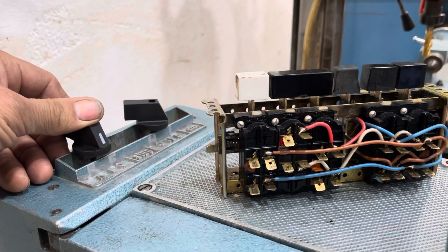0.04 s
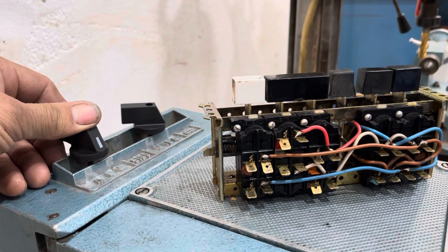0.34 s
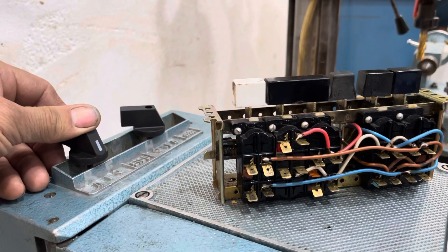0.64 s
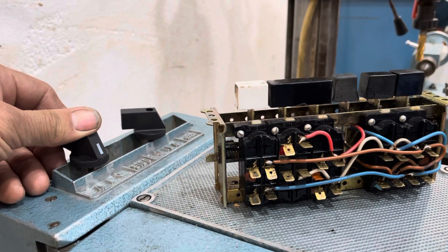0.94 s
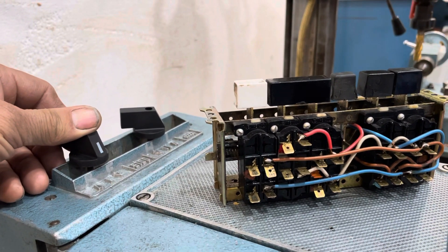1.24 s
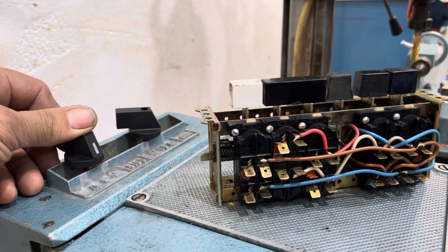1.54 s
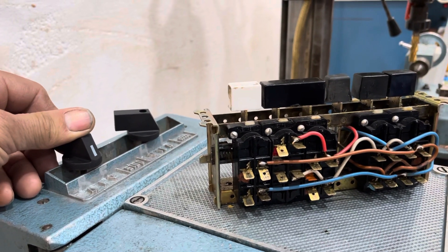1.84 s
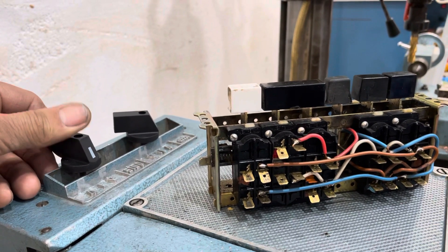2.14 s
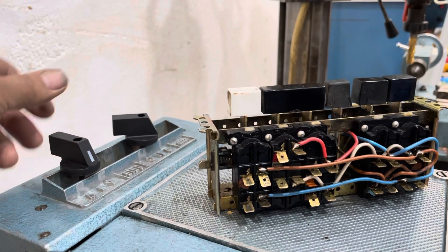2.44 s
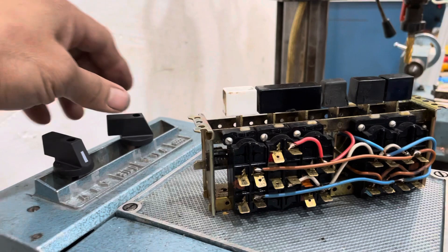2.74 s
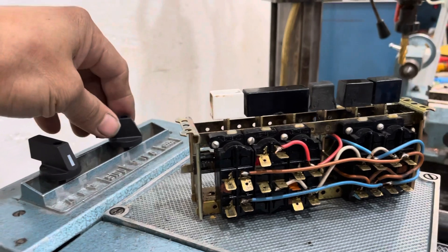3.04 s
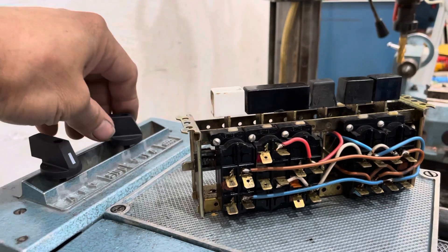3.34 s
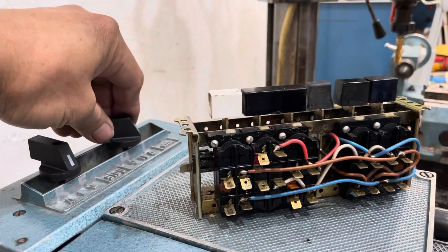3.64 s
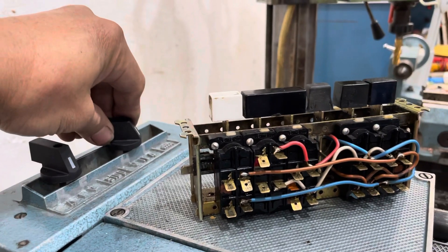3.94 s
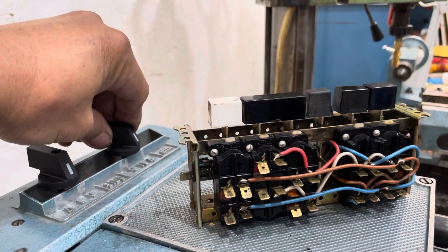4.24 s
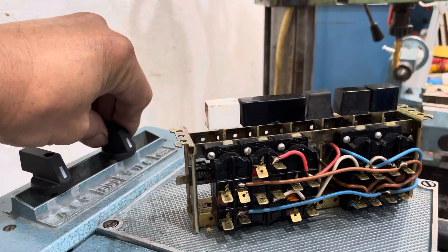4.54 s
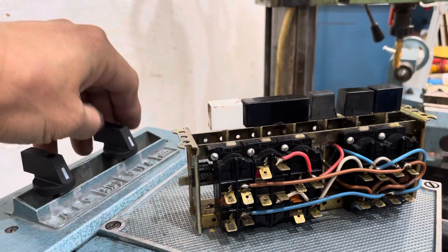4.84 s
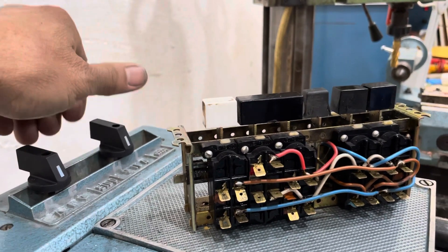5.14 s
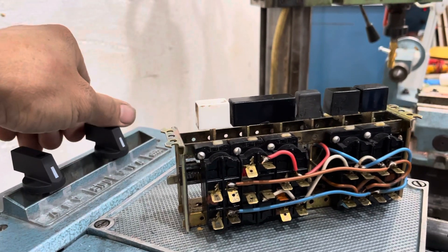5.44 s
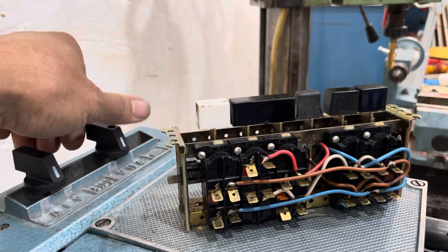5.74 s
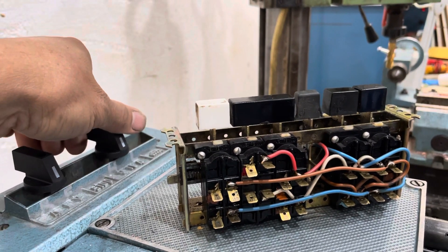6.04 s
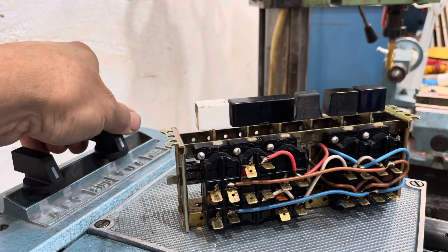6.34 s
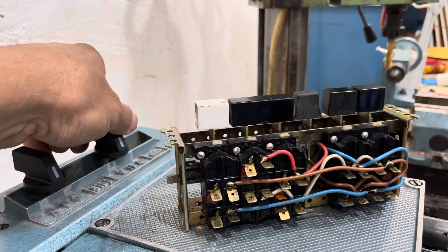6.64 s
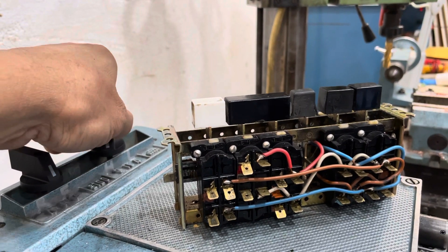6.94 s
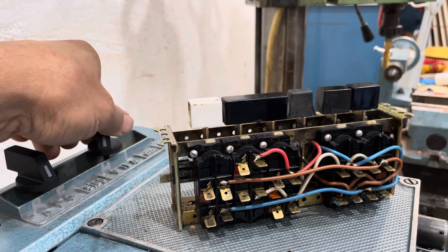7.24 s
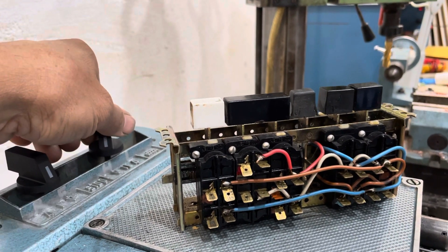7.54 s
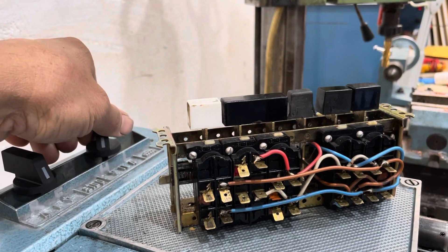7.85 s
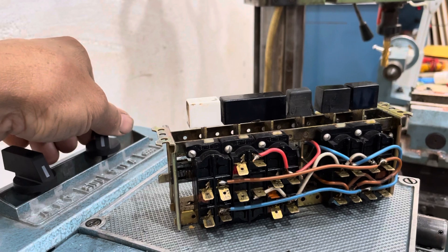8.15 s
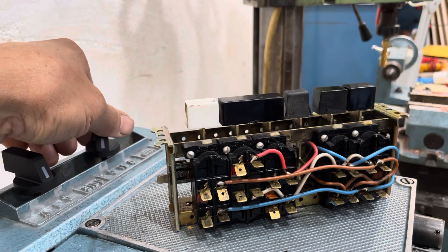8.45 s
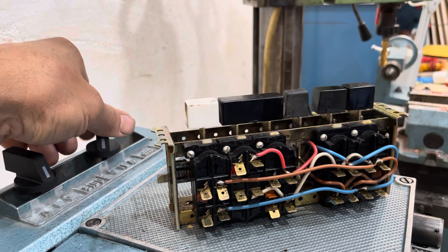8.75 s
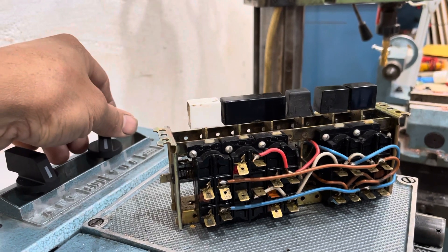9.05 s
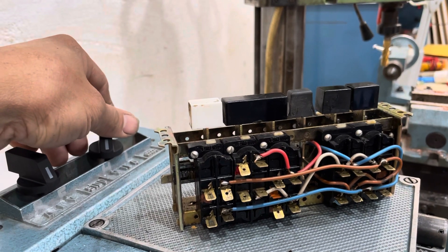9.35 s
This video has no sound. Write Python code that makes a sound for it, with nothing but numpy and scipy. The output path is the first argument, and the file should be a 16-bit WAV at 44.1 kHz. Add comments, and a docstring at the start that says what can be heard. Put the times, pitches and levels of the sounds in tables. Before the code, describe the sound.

Heard from close by in a workshop, a lathe motor hums steadily under a soft whine and rattle of gears. After a few small clicks, a switch turns it off, and it coasts down with falling tones and loose knocks. Following a short lull, a loud snap restarts it. It spins up quickly with a howl and settles at high speed, whining and rattling, while loose parts buzz and tick.

```python
"""A geared metal lathe runs in low speed, close to a two-port microphone in a workshop: the motor hums at
twice the mains frequency, gears and rotor slots whine, and tooth rattle rings the headstock. A rotary
switch scrapes and snaps off; the hum swells and dies, and slack gears knock and sing downward to rest.
The switch creaks and snaps on, the starting current makes the motor shudder and howl, and the lathe
climbs to high speed, where covers chatter and loose metal parts tick."""
import sys
import numpy as np
from scipy import signal
from scipy.fft import rfft, irfft, next_fast_len
from scipy.io import wavfile
from scipy.ndimage import uniform_filter1d

SR = 44100
rng = np.random.default_rng(int(sys.argv[2]) if len(sys.argv) > 2 else 0)


def waveform_to_disk(signal):
    """Save audio, clipped to [-1, 1], as 16-bit WAV at the path in sys.argv[1]."""
    frames = np.transpose(np.atleast_2d(signal))
    scaled = np.clip(frames, -1, 1) * 32767
    samples = np.round(scaled).astype(np.int16)
    wavfile.write(sys.argv[1], SR, samples)


N = 422478
TIME = np.arange(N) / SR
SIZE = next_fast_len(N + SR // 4, real=True)
BINS = np.maximum(np.arange(SIZE // 2 + 1) * SR / SIZE, 1)

OFF_S, ON_S, MAINS_HZ = 4.28, 6.8, 60
LOW_SPEED, HIGH_SPEED = 9.387, 18.733  # spindle turns per second
SLOT_ORDER = 66.36  # an order counts cycles per spindle turn
RESTARTED = TIME > ON_S

# room tone colour: f/Hz, level/dB
SHOP_COLOUR = [(18, -44.5), (30, 4.5), (125, -0.5), (228, -13.5), (511, -24.5), (837, -34), (1200, -27),
               (2630, -39.5), (15000, -46)]
# stereo image by frequency, wide in the middle, nearly mono in the highest treble:
# f/Hz, left phase lead/rad, likeness/0-1, left minus right/dB
STEREO_IMAGE = [(100, 0, .99, .2), (400, .1, .85, .8), (630, 0, .7, 1.8), (800, 0, .62, .6),
                (1300, -1.3, .45, -1), (1750, -2.2, .3, 2), (2150, .3, .55, 3), (3200, -.9, .6, 5),
                (4800, -.2, .55, 1), (6600, .7, .55, 1.5), (7600, 2.7, .75, 1), (8500, 3.14, .99, 0),
                (10500, 4.1, .6, 0), (12700, 6.28, .97, 0)]

# fingers shift the knob, which scrapes dully on its panel: t/s, length/s, level/dB
KNOB_SCRAPES = [(2.912, 0.025, -39), (3.325, 0.03, -42.5), (3.65, 0.041, -42), (4.388, 0.013, -37.5)]
# ring of the panel: f/Hz, width/Hz, level/dB
PANEL_RING = [(1280, 270, 1), (1740, 240, -2), (2700, 670, -7), (3400, 400, -9.5)]
# the knob clicks in its play: t/s, relative level/dB, crack/dB
CLICKS = [(2.917, -26, -0.5), (3.347, -22, 0), (3.876, -17, 0.5), (3.963, -24.5, -0.5), (3.982, -22.5, -2),
          (4.176, -19.5, 0.5), (4.419, -21.5, -4.5), (4.5486, -22.5, -7)]
# ring of the knob: f/Hz, level/dB, t60/s
KNOB_RING = [(1890, -6.5, .025), (3440, -3, 0.023), (6950, -6, 0.098), (13800, -6, .025)]
# colour of the rubbing cam: f/Hz, level/dB
RUB_COLOUR = [(300, -31), (850, -23.5), (1130, -5.5), (1480, -2), (1900, -10), (2700, 1.5), (4600, -3),
              (10000, 7), (15000, -19.5)]
# the cam sticks and slips: t/s, length/s, level/dB
CAM_CREAKS = [(4.25, .02, -42), (6.708, .012, -52), (6.727, 0.025, -48), (6.762, 0.019, -49)]
# ring of the cam: f/Hz, width/Hz, level/dB
CAM_RING = [(1150, 75, -2.5), (1476, 55, -6), (2200, 90, -12), (2840, 110, -11), (5150, 300, -6)]
# the switch snaps off, then on, and its contacts land: t/s, relative level/dB
SWITCH_SNAPS = [(4.281, -20.5), (6.7966, -9.5), (6.7999, -9.5), (6.81, -23)]
# ring of the switch and its panel: f/Hz, level/dB, t60/s
SWITCH_RING = [(660, -2.5, .026), (760, -1, .028), (969, -17.5, .33), (1093, -16.5, .38), (1123, -10, .047),
               (1670, -2, .012), (2160, -8, .035), (2330, -15, .03)]

# knocks of slack gears: t/s, level/dB, f/Hz, crack/dB
GEAR_KNOCKS = [(2.091, -25, 840, -12), (4.521, -20.5, 1245, -16), (4.545, -27, 1240, -8),
               (4.661, -22, 1150, -12), (4.687, -23, 1170, 2), (4.833, -26, 1170, -7),
               (4.849, -25, 1170, -4), (4.885, -31, 2780, -12), (5.252, -32, 1200, -8),
               (5.274, -22.5, 1280, 1), (5.603, -33, 520, -4), (5.636, -36, 170, -23),
               (6.277, -51.5, 645, -17)]
# accent ticks of loose metal parts: t/s, relative level/dB, crack/dB
METAL_TICKS = [(3.4296, -24, -5), (3.5359, -22.5, -7), (7.403, -17, -3), (7.4644, -13.5, 5),
               (7.6789, -13, -7), (7.7857, -15, -10), (7.946, -11, 4), (8.2132, -13, -15), (8.265, -16, -7),
               (8.319, -12.5, 1), (8.5864, -15, -2), (8.7478, -13.5, -3), (8.803, -21, -16)]
# ring of those parts: f/Hz, level/dB, t60/s
TICK_RING = [(6990, -17.5, .04), (12300, -0.5, 0.0064), (13300, -6, 0.0061), (13670, -8, 0.015)]
# the notes of covers and levers: f/Hz, width/Hz, level/dB
COVER_RING = [(1180, 40, -1), (1610, 35, -2), (1900, 50, -2), (2090, 50, -3), (2220, 60, -2),
              (2750, 60, -4), (3500, 70, -10)]
# ring of the gear housing: f/Hz, width/Hz, level/dB
HOUSING_RING = [(118.6, 17, -2.5), (211, 13, -4), (526, 15, -0.5), (685, 50, -3.5), (881, 13, -2.5),
                (5040, 340, -17.5)]
# broad colour of the headstock: f/Hz, level/dB
HEADSTOCK_COLOUR = [(30, -35), (65, -17.5), (130, -26.5), (420, -11), (900, 1), (1450, -3), (2400, -14.5),
                    (4000, -15.5), (6000, -15.5), (8000, -25.5), (9500, -10.5), (14000, -20), (15500, -30)]
# its resonances: f/Hz, width/Hz, boost/dB
HEADSTOCK_RING = [(132, 48, 19.1), (194.4, 138, 9.65), (299, 106, 6.9), (520, 215, 7.4), (635.3, 23, 9.1),
                  (871, 51, 4.3), (980, 13, 5.3), (1133, 12, 1.2), (1170, 18, 9.2), (1290, 33, 5.4),
                  (1598, 43, 12.3), (1854, 76, 7.1), (2180, 280, 10.6), (2550, 110, 6.6), (2720, 460, 7.9),
                  (3100, 100, 9.9), (3494, 490, 11.2), (4420, 480, 6.2), (5050, 490, 9.7), (6380, 290, 5.9),
                  (7390, 1500, 11.8), (13780, 260, 5.5)]
# tooth rattle, rows clatter, rumble, hiss:
# low-speed level/dB, high-speed level/dB, speed exponent coasting, speed exponent starting
RATTLE_BANDS = [(-43, -33.5, 1.82, 1.65), (-47.5, -45.5, 1.4, 0.39), (-47.5, -35, 2.66, 2.17)]

# the run-up, steepest just before full speed: t/s, speed/(turns per s)
RUN_UP_CURVE = [(6.82, 0), (7.03, 5.9), (7.15, 8), (7.25, 9.6), (7.325, 11.4), (7.375, 13.4), (7.41, 15.7),
                (7.46, 17.7), (7.53, HIGH_SPEED)]
# tones sung by the backs of the unloaded teeth: order/(cycles per turn)
BACK_ORDERS = [28.5, 44, 82, 87.7, 94, 107, 132, 148]
# their mix: level/dB
BACK_DB = [-55.5, -49.5, -52.5, -48.5, -52, -57, -58, -58]
# ring of the motor shell: f/Hz, width/Hz, level/dB
SHELL_RING = [(740, 65, 0), (885, 65, -4)]
# gear, bearing and slot tones under power: order/(cycles per turn)
WHINE_ORDERS = [6, 7, 7.6, 33.6, 34.8, 40, 52, 58, 67.2, 68.3, 90, 104, 119.22, 134.4, 151.2, 170.4, 180]
# their mix in low speed: level/dB
WHINE_LOW_DB = [-76, -69, -64.5, -46, -60, -59, -51.5, -66.5, -47.5, -64, -42, -54, -58.5, -70.5, -48.5,
                -72.5, -56.5]
# their mix in high speed: level/dB
WHINE_HIGH_DB = [-70, -67, -54, -24.5, -46, -46, -57, -41.5, -52.5, -55, -36.5, -60, -44, -45.5, -67, -57.5,
                 -45]
# slot tone and sidebands: offset/(twice the mains frequency), low-speed level/dB, high-speed level/dB
SLOT_TONES = [(-1, -54.5, -50), (0, -59.5, -40.5), (1, -36, -63), (2, -56, -64)]
# mains buzz: harmonic number, low-speed level/dB, high-speed level/dB
MAINS_BUZZ = [(1, -51, -49), (4, -34, -45), (6, -46, -51.5)]


def undb(db):
    """Decibels to gain."""
    return 10 ** (np.asarray(db) / 20)


def spectra(table):
    """The columns of a frequency table, joined on a log axis."""
    points, *columns = np.transpose(table)
    return [np.interp(np.log(BINS), np.log(points), c) for c in columns]


def unit(x):
    """Scale to rms 1."""
    return x / np.sqrt(np.mean(x ** 2))


def walk(rate):
    """A smooth random wobble of rms 1, with `rate` new values a second."""
    k = int(SR / rate)
    points = rng.standard_normal(N // k + 2)
    return unit(uniform_filter1d(np.interp(TIME, np.arange(len(points)) / rate, points), k // 2))


def grit(depth_db, rate):
    """Noise with a grainy, flickering level."""
    return rng.standard_normal(N) * undb(depth_db * walk(rate))


def ramp(start, length):
    """A straight fade from 0 to 1."""
    return np.clip((TIME - start) / length, 0, 1)


def envelope(start, attack, hold, t60):
    """A straight attack, a hold and an exponential release."""
    released = np.maximum(TIME - start - attack - hold, 0)
    return ramp(start, attack) * np.exp(-np.log(1000) * released / t60)


def resonate(x, hz, width):
    """One resonance, gain 1 at its centre."""
    return signal.lfilter(*signal.iirpeak(hz, hz / width, fs=SR), x)


def cut(x, order, hz, kind="low"):
    """A low-pass or high-pass filter."""
    return signal.sosfilt(signal.butter(order, hz, kind, fs=SR, output="sos"), x)


def colour(x, table):
    """Equalise by a table of frequencies and levels."""
    return irfft(rfft(x, SIZE) * undb(spectra(table)[0]), SIZE)[:N]


def band_level(spectrum, lo, hi):
    """The sound of a spectrum, scaled so that the band lo-hi has rms 1."""
    power = 2 * np.sum(np.abs(spectrum[(BINS > lo) & (BINS < hi)]) ** 2) / (SIZE * N)
    return irfft(spectrum, SIZE)[:N] / np.sqrt(power)


def strike(modes, crack_db, crack_s, rise_s=1e-5):
    """One hit of peak 1: a short crack and modes (f/Hz, level/dB, t60/s); soft contacts rise slowly."""
    t = TIME[:SR // 2]
    hit = undb(crack_db) * rng.standard_normal(len(t)) * np.exp(-t / crack_s)
    for hz, db, t60 in modes:
        decay = undb(db + rng.normal(0, .88)) * np.exp(-np.log(1000) * t / t60)
        hit += decay * np.sin(2 * np.pi * (hz * t + rng.random()))
    hit *= 1 - np.exp(-t / rise_s)
    return hit / np.abs(hit).max()


def add(track, s, sound):
    """Lay a sound into a track at time s."""
    i = int(s * SR)
    track[i:i + len(sound)] += sound[:N - i]


def share_of_full(speed):
    """Speed as a share of the selected speed."""
    return speed / np.where(RESTARTED, HIGH_SPEED, LOW_SPEED)


def room_tone(level_db=-64):
    """The quiet, dark noise floor of the shop."""
    return undb(level_db) * unit(colour(rng.standard_normal(N), SHOP_COLOUR))


def shop_reverb(x, t60=.39, wet_db=-12):
    """A short diffuse tail from the bench and walls."""
    t = TIME[:SR // 2]
    tail = rng.standard_normal(len(t)) * np.exp(-np.log(1000) * t / t60) * (t > .004)
    tail = signal.lfilter([1], [1, -.6], tail)  # darken
    return undb(wet_db) * signal.fftconvolve(x, tail / np.linalg.norm(tail))[:N]


def stereo(direct, scattered):
    """Direct sound in the mid, scattered sound in the side; width, phase and pan vary with frequency."""
    lead, likeness, balance_db = spectra(STEREO_IMAGE)
    sign = np.array([[1], [-1]])
    mid = np.sqrt((1 + likeness) / 2) * rfft(direct, SIZE)
    side = np.sqrt((1 - likeness) / 2) * rfft(scattered, SIZE)
    pan = np.exp(.5j * sign * lead) * undb(sign * balance_db / 2)
    return irfft((mid + sign * side) * pan, SIZE)[:, :N]


def friction(strokes, modes):
    """Short strokes of stick and slip ring a set of resonances."""
    slips = grit(4, 700)
    pressure = sum(undb(db) * envelope(s, .005, length, t60=.056) for s, length, db in strokes)
    return pressure * sum(undb(db) * unit(resonate(resonate(slips, hz, width), hz, 4 * width))
                          for hz, width, db in modes)


def switch(rub_db=-42, slip_db=-23, snap_trim_db=-3, click_trim_db=-3):
    """The knob scrapes and clicks, the cam rubs and creaks against its spring, the contacts snap over."""
    rub = undb(rub_db) * sum((TIME < s) * envelope(s - .11, .037, 0, t60=.39) for s in (OFF_S, ON_S))
    slip = undb(slip_db) * (TIME < ON_S) * np.exp(-np.abs(TIME - ON_S) / .0079)  # over the cam's crest
    out = (rub + slip) * unit(colour(grit(1.9, 1200), RUB_COLOUR))
    out += friction(CAM_CREAKS, CAM_RING) + friction(KNOB_SCRAPES, PANEL_RING)
    for s, db in SWITCH_SNAPS:
        snap = strike(SWITCH_RING, crack_db=1.5, crack_s=.006, rise_s=.0008)
        snap += undb(2.5) * resonate(snap, hz=5200, width=3200)  # the plastic body brightens the crack
        add(out, s, undb(db + snap_trim_db) * snap)
    for s, db, crack_db in CLICKS:
        click = strike(KNOB_RING, crack_db, crack_s=.009, rise_s=.001)
        add(out, s, undb(db + click_trim_db) * cut(click, 1, hz=6000))
    return cut(out, 2, 480, "high")


def gear_knocks():
    """Slack gears knock with a short, dull ring."""
    out = np.zeros(N)
    for s, db, hz, crack_db in GEAR_KNOCKS:
        modes = [(hz, 0, .028), (hz * 1.2, -4, .025), (hz * .76, -5, .02)]
        add(out, s, undb(db) * strike(modes, crack_db, crack_s=.013))
    return cut(out, 3, hz=4800)


def drive_bumps(first_s=6.13, gap_s=.05, level_db=-39):
    """The drive bumps softly and evenly in its last turn."""
    out = np.zeros(N)
    for k in range(4):
        bump = strike([(62, -6, .15), (119, -1, .16), (210, -3, .1)], crack_db=1, crack_s=.022)
        add(out, first_s + k * gap_s, undb(level_db) * bump)
    return cut(out, 2, hz=400)


def metal_ticks(trim_db=-4):
    """Loose metal parts tick brightly: placed accents, plus softer strays in high speed."""
    out = np.zeros(N)
    full_speed_s = RUN_UP_CURVE[-1][0]
    strays = [(rng.uniform(full_speed_s, TIME[-1]), rng.normal(-27, 2.5), -12) for _ in range(10)]
    for s, db, crack_db in list(METAL_TICKS) + strays:
        add(out, s, undb(db + trim_db) * strike(TICK_RING, crack_db, crack_s=.005, rise_s=.0015))
    return cut(out, 4, hz=14500)


def cover_chatter(speed, level_db=-52.5, spread_db=5):
    """Loose covers and levers buzz in uneven spurts near full speed, each on its own note."""
    ring = 0
    for hz, width, db in COVER_RING:
        spurts = rng.standard_normal(N) * undb(spread_db * np.minimum(walk(70), 2))
        ring += undb(db) * unit(resonate(spurts, hz, width))
    shaking = share_of_full(speed) ** 6 * np.where(RESTARTED, HIGH_SPEED / LOW_SPEED, 1)
    return undb(level_db) * shaking * ring


def gear_tumble(speed, level_db=-47.5):
    """Without load the teeth fall loosely against each other and ring the housing."""
    impacts = grit(3.5, 120)
    strength = undb(level_db) * ramp(OFF_S, .3) * (TIME < ON_S) * share_of_full(speed) ** .95
    return strength * sum(undb(db) * unit(resonate(impacts, hz, width)) for hz, width, db in HOUSING_RING)


def tooth_impacts(turns, unloaded, per_turn=700, throb_db=.64):
    """Uneven teeth strike; part of their pattern comes round again with the gear train."""
    errors = rfft(rng.standard_normal(4096))
    teeth = unit(irfft(errors * undb(3 * rng.standard_normal(len(errors)))))  # some orders stand out
    passed = np.floor(turns * per_turn).astype(int)
    pattern = (np.diff(passed, prepend=0) > 0) * teeth[passed % len(teeth)]
    pattern /= np.sqrt(uniform_filter1d(pattern ** 2, SR // 10).clip(0) + .0039)  # even out the level
    repeating = .55 + .37 * unloaded  # coasting teeth repeat more exactly
    force = np.sqrt(repeating) * pattern + np.sqrt(1 - repeating) * unit(grit(2, 900))
    throb = np.cos(2 * np.pi * turns) + np.cos(12 * np.pi * turns)
    return force * undb(throb_db * throb + .7 * walk(16))


def tooth_rattle(speed, turns, unloaded_db=-1.8, drag_db=-73.5):
    """Tooth impacts ring the headstock in three bands, each growing as a power of speed."""
    unloaded = (TIME > OFF_S) & (TIME < ON_S)
    peaks_db = sum(db / (1 + (2 * (BINS - hz) / width) ** 2) for hz, width, db in HEADSTOCK_RING)
    ring = rfft(tooth_impacts(turns, unloaded), SIZE) * undb(spectra(HEADSTOCK_COLOUR)[0] + peaks_db)
    bass, treble = 1 / (1 + (BINS / 380) ** 3), 1 / (1 + (1900 / BINS) ** 4)
    eased = undb(unloaded_db * unloaded * ramp(OFF_S, .2))  # unloaded teeth strike more softly
    clatter = eased * band_level(ring * (1 - bass - treble), 900, 1500)
    rumble = eased * band_level(ring * bass, 150, 225)
    hiss = band_level(ring * treble, 2500, 7000)
    drive = share_of_full(speed)
    out = undb(drag_db) * np.tanh(10 * drive) * hiss  # the bearings rub while the spindle turns
    for band, (low_db, high_db, coasting, starting) in zip((clatter, rumble, hiss), RATTLE_BANDS):
        gain = np.where(RESTARTED, undb(high_db) * drive ** starting, undb(low_db) * drive ** coasting)
        out += gain * band
    return out


def noise_layers(speed, turns):
    """All the noisy sound as it leaves one face of the machine, over the quiet shop."""
    hits = switch() + gear_knocks() + drive_bumps() + metal_ticks()
    background = room_tone() + shop_reverb(hits)
    return background + hits + tooth_rattle(speed, turns) + cover_chatter(speed) + gear_tumble(speed)


def coast_whine(speed, turns, flutter_db=6, housing_db=-16, bed_db=15):
    """Unloaded gears catch and let go in broken, falling whines that flare in the housing and bed."""
    angle = 2 * np.pi * (turns + .0007 * walk(45))  # the gears wander in their play
    tones = 0
    for order, db in zip(BACK_ORDERS, BACK_DB):
        gain = undb(db + flutter_db * np.minimum(walk(13), 1.1))
        tones += gain * np.sin(order * angle + .38 * walk(50))
    tones *= np.sqrt(2) * ramp(OFF_S, .065) * (TIME < ON_S) * share_of_full(speed) ** 2.1
    housing = sum(resonate(tones, hz, width) for hz, width, _ in HOUSING_RING)
    return tones + undb(housing_db) * housing + undb(bed_db) * resonate(tones, hz=131, width=40)


def starting_howl(angle, mains, drive, loudest_db=-19, surge_db=2.4, surge_s=7.115, surge_gap_s=.24):
    """Current peaks chop the rising slot tone; its sidebands flare in the motor shell's resonances."""
    rough_tone = np.sin(SLOT_ORDER * angle + .5 * walk(110)) + 1.2 * rng.standard_normal(N)
    chopped = np.exp(2.5 * np.cos(2 * mains)) * rough_tone
    shell = sum(undb(db) * resonate(resonate(chopped, hz, width), hz, 3 * width)
                for hz, width, db in SHELL_RING)
    shell = cut(shell, 6, 500, "high")  # the howl stays above the bass
    shell *= RESTARTED * drive ** 1.15 * np.tanh((1 - drive) / .035)  # gone at full speed
    shell *= undb(surge_db * np.cos(2 * np.pi * (TIME - surge_s) / surge_gap_s))
    return undb(loudest_db) * shell / np.sqrt(uniform_filter1d(shell ** 2, SR // 25).max())


def stator_hum(mains, powered, low_speed_db=-30, high_speed_db=-30.5, waver_db=.36, sag_hz_per_s=41):
    """Magnetic hum and buzz: a swell as the contacts part, a shudder from the starting current."""
    settling_db = -14 * (1 - ramp(ON_S, .86))  # the hum starts weak and settles
    restart = ramp(ON_S, .08) * undb(high_speed_db + settling_db)
    running = np.where(RESTARTED, restart, powered * undb(low_speed_db))
    swell = undb(-22) * envelope(OFF_S - .014, attack=.028, hold=.035, t60=.57)
    sag = np.pi * sag_hz_per_s * np.maximum(TIME - OFF_S, 0) ** 2 * ~RESTARTED  # the cut-off rotor slows
    hum = np.hypot(running, swell) * undb(waver_db * walk(16)) * np.sin(2 * mains - sag)
    pull_in = TIME - 7.68  # the level wavers as the rotor pulls in to full speed
    hum *= undb(2.5 * np.exp(-np.abs(pull_in) / .35) * np.cos(2 * np.pi * pull_in / .23))
    shudder = undb(-42.5) * envelope(ON_S, attack=.079, hold=.081, t60=.32) * np.sin(mains)
    for harmonic, low_db, high_db in MAINS_BUZZ:
        db = np.where(RESTARTED, high_db + settling_db, low_db) + waver_db * walk(8.3)
        hum += powered * undb(db) * np.sin(harmonic * mains)
    return hum + shudder


def gear_whine(angle):
    """Gear, bearing and slot tones, locked to the spindle and fluttering in level."""
    whine = 0
    for order, low_db, high_db in zip(WHINE_ORDERS, WHINE_LOW_DB, WHINE_HIGH_DB):
        flutter_db = .1 if high_db == max(WHINE_HIGH_DB) else 3.5  # the main mesh is the steadiest
        db = np.where(RESTARTED, high_db, low_db) + flutter_db * np.minimum(walk(22), 1.5)
        whine += undb(db) * np.sin(order * angle + .32 * walk(25))
    return whine


def slot_whine(angle, mains, turns, belt_per_turn=.355, throb_db=1.2):
    """The rotor slots sing with mains sidebands, throbbing as the belt's joint comes round."""
    whine = 0
    for offset, low_db, high_db in SLOT_TONES:
        db = np.where(RESTARTED, high_db, low_db) + .9 * walk(28)
        whine += undb(db) * np.sin(SLOT_ORDER * angle + 2 * offset * mains)
    return whine * undb(throb_db * np.sin(2 * np.pi * belt_per_turn * turns))


def motor(speed, turns):
    """The lead voice: mains hum, whines that sing out under load near full speed, and the howl."""
    mains = 2 * np.pi * MAINS_HZ * TIME
    angle = 2 * np.pi * (turns + .0013 * walk(9))  # the belt lets the shaft sway slightly
    drive = share_of_full(speed)
    powered = np.interp(TIME, [OFF_S, OFF_S + .04, ON_S, ON_S + .4], [1, 0, 0, 1])
    loaded = np.where(RESTARTED, powered, 1 - ramp(OFF_S, .14))  # the whine sags briefly before it dies
    whine = drive ** 3.15 * gear_whine(angle) + drive ** 2 * slot_whine(angle, mains, turns)
    return np.sqrt(2) * (stator_hum(mains, powered) + loaded * whine) + starting_howl(angle, mains, drive)


def spindle_speed(coast_s=2.03):
    """Turns per second: steady low speed, slowed evenly to rest by friction, then the run-up."""
    coasting = LOW_SPEED * (1 - ramp(OFF_S, coast_s))
    run_up = np.interp(TIME, *np.transpose(RUN_UP_CURVE))
    return np.maximum(uniform_filter1d(coasting + run_up, SR // 25), 0)


def scene():
    """The lathe's tones and noise layers, spread in stereo."""
    speed = spindle_speed()
    turns = np.cumsum(speed) / SR
    tones = motor(speed, turns) + coast_whine(speed, turns)
    standing = signal.hilbert(tones, SIZE).imag[:N]  # standing waves in the shop lag a quarter cycle
    return stereo(tones + noise_layers(speed, turns), standing + noise_layers(speed, turns))


def record(dry):
    """A steep low-pass takes off the air above 15.7 kHz."""
    return signal.sosfilt(signal.ellip(12, .2, 90, 15700, fs=SR, output="sos"), dry)


dry = scene()
out = record(dry)
waveform_to_disk(out)
```